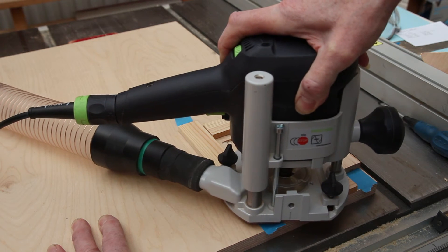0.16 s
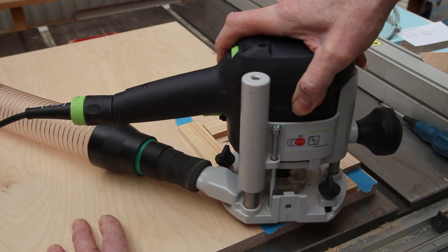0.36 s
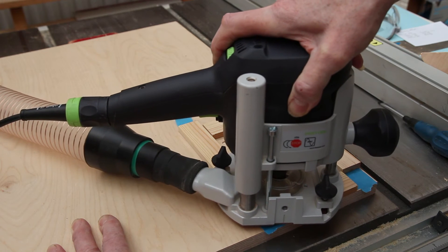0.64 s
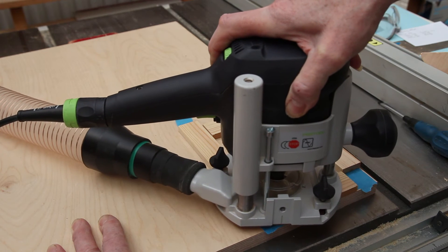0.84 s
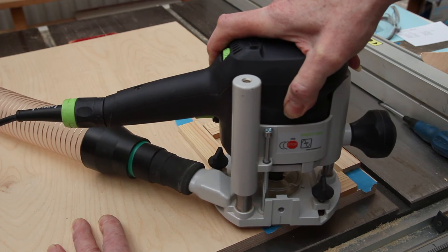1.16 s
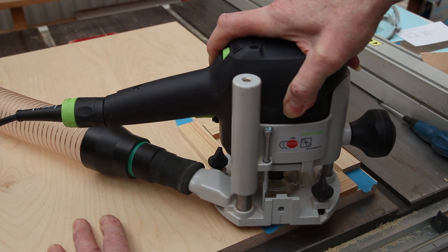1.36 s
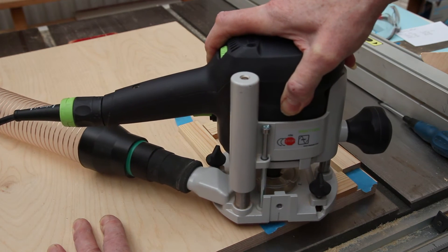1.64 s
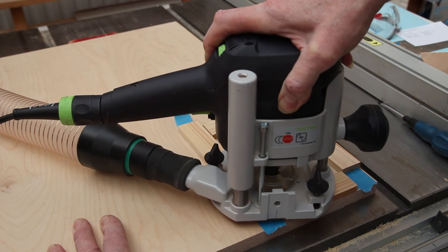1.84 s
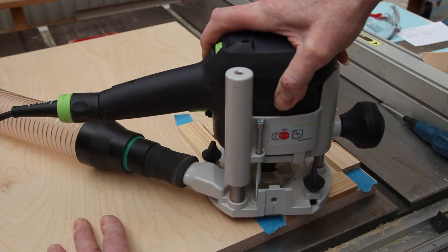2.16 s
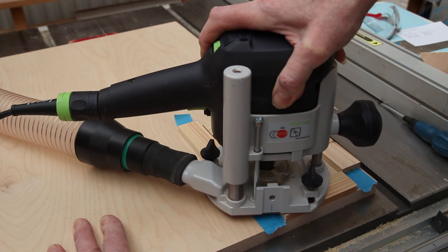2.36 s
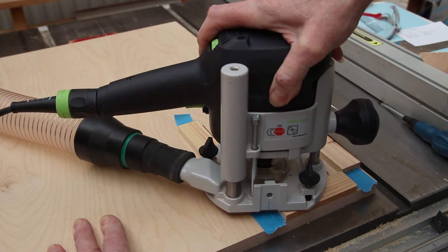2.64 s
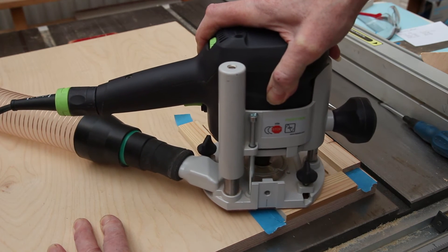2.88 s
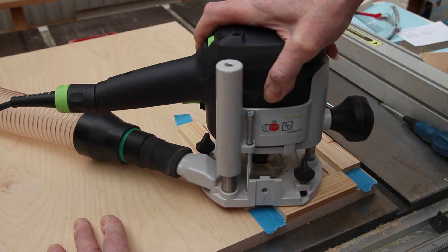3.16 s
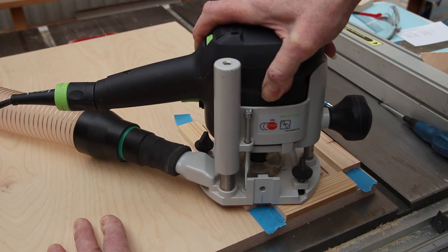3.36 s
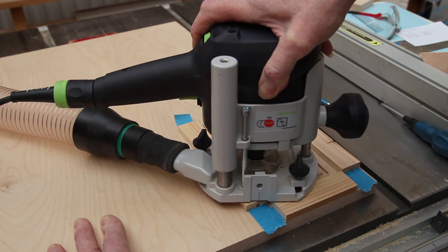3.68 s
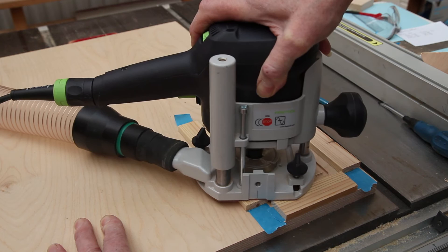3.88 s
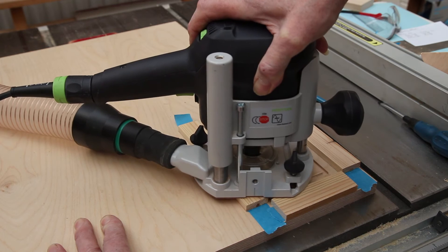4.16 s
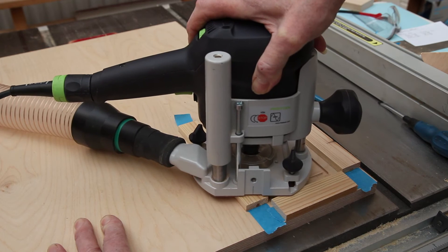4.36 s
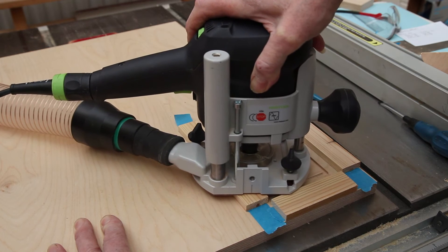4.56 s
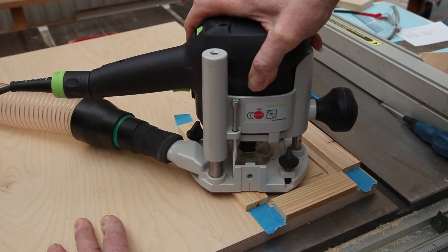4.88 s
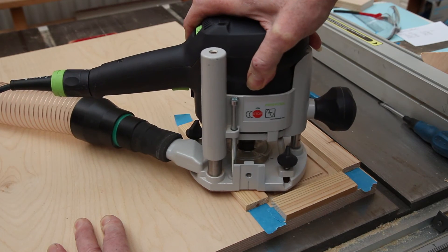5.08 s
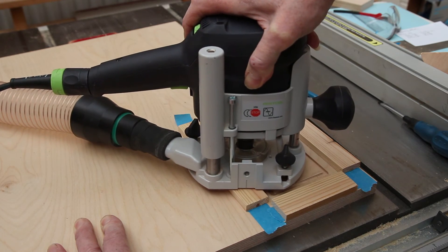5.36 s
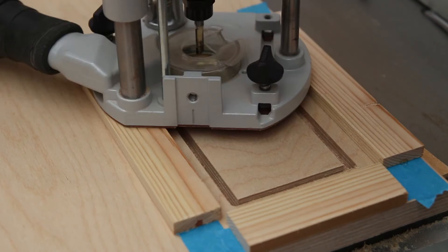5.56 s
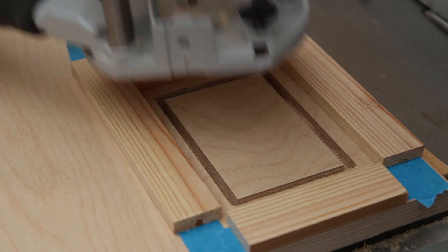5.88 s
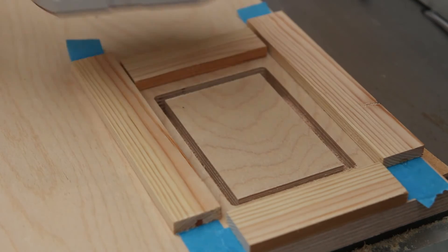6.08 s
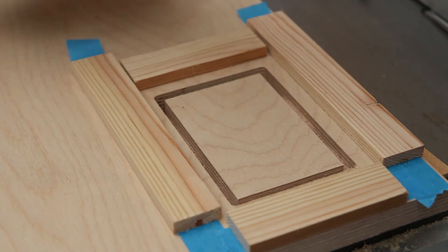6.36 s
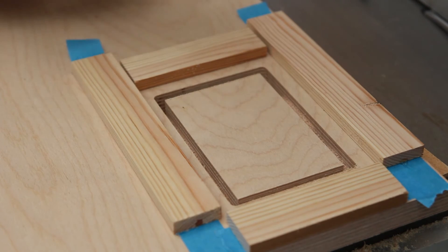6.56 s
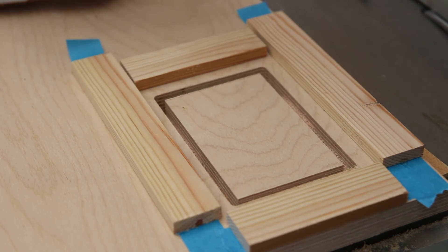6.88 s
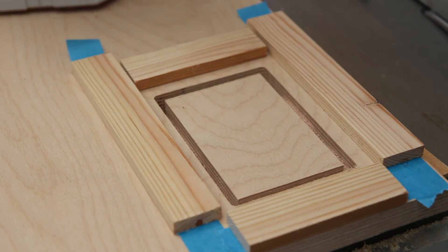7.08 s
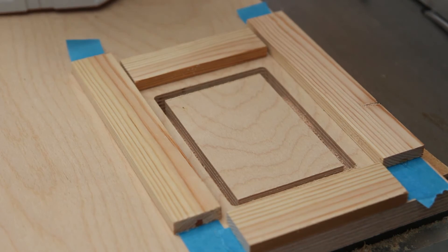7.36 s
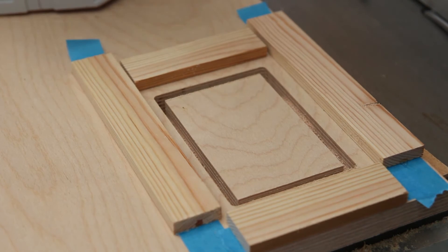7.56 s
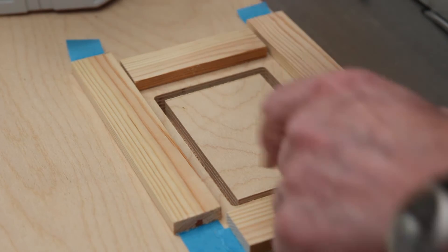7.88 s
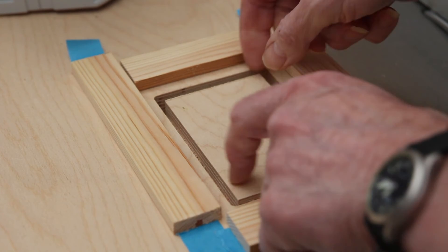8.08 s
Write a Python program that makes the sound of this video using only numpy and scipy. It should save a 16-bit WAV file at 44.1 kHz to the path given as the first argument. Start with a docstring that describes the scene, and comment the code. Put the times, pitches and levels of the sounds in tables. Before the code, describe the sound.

Close up in a workshop, a router bit shrieks unevenly through plywood above a humming motor and rushing air, spinning free for a moment before biting again. The loud noise stops suddenly, leaving low room tone. A few tiny ticks and a quick run of snaps from a dragged dust hose follow, then several dull thuds on the bench and a soft rustle of cloth.

```python
"""A plunge router screeches through plywood: its bit chatters near 5 kHz over motor tones and a roar
of air and chips. The tones follow the shaft, which slows under the load of an uneven hand feed.
At 5.6 s the sound cuts off abruptly. In the quiet shop the ribbed dust hose rattles over an edge, the
tool is set down with dull knocks that ring the bench top, and a sleeve brushes the board."""
import sys
import numpy as np
from scipy import signal
from scipy.fft import rfft, irfft, next_fast_len
from scipy.io import wavfile
from scipy.ndimage import uniform_filter1d, map_coordinates

SR = 44100
rng = np.random.default_rng(int(sys.argv[2]) if len(sys.argv) > 2 else 0)


def wav_record(signal):
    """Record a signal, one row per channel, as 16-bit PCM in the file named by sys.argv[1]."""
    frames = np.transpose(np.atleast_2d(signal))
    bounded = np.clip(frames, -1, 1)
    # unit amplitude maps onto the largest positive 16-bit level
    quanta = np.round(bounded * 32767).astype(np.int16)
    wavfile.write(sys.argv[1], SR, quanta)


N = 362943

# Stereo images of the router's noise and of the quiet sounds. Each row: Hz, left-right likeness.
NEAR_IMAGE = [(60, 0.93), (180, 1), (550, 0.99), (1650, 0.99), (4970, 0.78), (15000, 0.091)]
FAR_IMAGE = [(60, 0.99), (240, 0.86), (950, 0.28), (3770, 0.18), (15000, -0.14)]
# The scuff of hose or cloth on wood. Each row: frequency in Hz, level in dB.
SCUFF_SPECTRUM = [(2200, -19.5), (3300, -0.5), (4500, -4), (5800, -10), (7000, -15), (9000, -27)]


def router():
    """Chatter, roar and motor around one shaft; the load bends its speed and drives the tones."""
    # The bit is in the wood. Each row: entry and exit in seconds.
    cuts = [(-.1, 1.06), (1.511, 5.7)]
    # The uneven feed. Each row: time in seconds, turns a second, chatter in dB, outer sideband trim in dB.
    feed = [(0.0, 322.8, -15, -7.5), (0.04, 321.3, -18.5, -8), (0.09, 324, -21, -7.5),
            (0.2, 326.3, -22.5, -5), (0.24, 331, -25.5, -3), (0.32, 327.4, -21, -6),
            (0.35, 328.4, -27, 0.5), (0.41, 329.5, -19.5, -5), (0.51, 329.8, -25, -3),
            (0.55, 328.7, -19, -7), (0.6, 327.8, -25.5, -2), (0.65, 329.7, -20, -6), (0.8, 328.2, -23, -4),
            (0.89, 328.6, -23, -2), (1.0, 329.5, -21, -5.5), (1.07, 327, -23, -6.5),
            (1.1, 334.8, -19.5, 1.5), (1.46, 332.2, -23.5, -1), (1.515, 331.5, -21, -5),
            (1.63, 328.7, -23, -4.5), (1.71, 324, -18.5, -6), (1.8, 325.5, -24.5, -3.5),
            (1.93, 323.4, -17.5, -5.5), (2.0, 328, -29, 0), (2.085, 328.4, -28.5, 1.5),
            (2.11, 326.3, -20, -5.5), (2.17, 324.8, -21.5, -4.5), (2.24, 324.8, -18, -8.5),
            (2.31, 327, -30.5, 4.5), (2.37, 327.6, -22.5, -10), (2.41, 329.3, -29, 1),
            (2.57, 330.5, -22.5, -4), (2.65, 329.4, -26, -0.5), (2.71, 325, -19.5, -7),
            (2.75, 327.2, -25, 2.5), (2.8, 323.7, -24.5, 0), (2.98, 329.7, -31.5, 2),
            (3.08, 324.7, -23, -2), (3.2, 328, -30, 5.5), (3.28, 330.5, -24, -4), (3.34, 327.2, -24, 1.5),
            (3.38, 327, -20, -4), (3.52, 323.7, -19.5, -5.5), (3.65, 328.4, -29.5, 2), (3.72, 327, -19, -4),
            (3.83, 330.2, -31, 4.5), (3.94, 325, -17.5, -5.5), (3.99, 327.2, -22, -2.5),
            (4.03, 326, -18, -5), (4.07, 323, -22.5, 1.5), (4.11, 320.4, -19, -8.5), (4.15, 326.4, -21, -5),
            (4.2, 320.2, -19, -7.5), (4.28, 323, -20.5, -3), (4.32, 328.4, -22.5, -4.5),
            (4.41, 326.4, -22.5, -5), (4.47, 330.2, -23, -1.5), (4.52, 327.5, -27.5, 2),
            (4.6, 324, -16, -8.5), (4.65, 324.8, -25, -1), (4.69, 329.6, -26.5, -0.5), (4.76, 326, -15, -8),
            (4.83, 327.5, -25.5, -3.5), (4.88, 325.3, -17, -5.5), (5.01, 323.8, -20.5, -3),
            (5.07, 322.2, -19.5, -7), (5.19, 333.2, -25.5, -3.5), (5.32, 327.3, -20.5, -5.5),
            (5.39, 331, -24, -4), (5.45, 329, -18, -4.5), (5.49, 327.2, -26.5, -1.5),
            (5.52, 329.7, -21, -7.5), (5.55, 327, -27, 3), (5.59, 327, -23.5, -3.5)]
    # The mix at the usual load. Each row: time in seconds, then in dB the roar, the unbalance tone,
    # the fourth-order tone and the chatter's lean to the left.
    mix = [(0, -28.5, -40.5, -40.5, -2.5), (.1, -30.5, -38.5, -44, 0), (.28, -29, -41, -36.5, -2.5),
           (.85, -27.5, -46, -45, -3), (1.06, -27, -43, -38.5, -1), (1.16, -27, -35.5, -41, -3),
           (1.34, -23, -37, -37, -3), (1.48, -21, -35, -30, -3), (1.62, -27, -43.5, -44, -6),
           (1.8, -28.5, -39.5, -39, -2), (2.5, -27.5, -47, -37.5, -4), (2.85, -29, -44.5, -34.5, -3),
           (3.45, -27, -42, -33, -1), (3.95, -27.5, -45.5, -33.5, -1), (4.1, -28, -40.5, -35, -4),
           (4.27, -29, -45, -34, -2), (4.5, -27.5, -47.5, -34.5, -0.5), (5.08, -29, -45, -37, -3),
           (5.16, -28, -49, -36.5, -1.5), (5.6, -26, -53, -35, -1.5)]
    cutoff_s, bite_s, leave_s, fade_s = 5.602, 0.0086, 0.03, 0.0009
    drift_hz, judder_hz, usual_chatter_db = 0.252, 0.8, -23.5
    n = int(cutoff_s * SR)
    t = np.arange(n) / SR
    cutting = sum(np.clip(1 + np.minimum((t - enters) / bite_s, (leaves - t) / leave_s), 0, 1)
                  for enters, leaves in cuts)
    speed, chatter_db, outer_db = curves(feed, n)
    roar_db, unbalance_db, fourth_db, lean_db = curves(mix, n)
    push_db = cutting * (chatter_db - usual_chatter_db)
    turns = np.cumsum(speed + drift_hz * wobble(15, n) + cutting * judder_hz * wobble(30, n)) / SR
    screech = bit_chatter(turns, push_db, outer_db, first_cut=t < cuts[1][0] - leave_s)
    screech += amp(outer_db - 15) * chip_spray(turns)
    roar = motor_whine(turns, cutting) + air_roar(cutting, roar_db)
    hum = shaft_hum(turns, push_db, unbalance_db, fourth_db)
    sway = panned(lean_db + 0.17 * push_db + 2 * wobble(11, n))  # harder chatter leans left
    tool = cutting ** 2 * amp(chatter_db) * sway * screech
    tool += panned(-2.9)[:, None] * (amp(roar_db) * roar + hum)
    fade = np.clip((n - np.arange(n)) / (fade_s * SR), 0, 1)
    return np.pad(tool * fade, ((0, 0), (0, N - n)))


def bit_chatter(turns, push_db, outer_db, first_cut):
    """The bit leaves waves on the wood; chopped once a turn, its tone splits into sidebands."""
    # One row a shaft order, from 6 below the chatter upward. Each row: dB in the first cut, in the second.
    sidebands = [(-21, -18.5), (-14, -13), (-13, -9.5), (-8.5, -12.5), (-2.5, -8), (-2.5, 0), (1, 0.5),
                 (-9, -8), (-8.5, -8), (-12, -10), (-19, -18.5), (-13, -15), (-18, -27.5), (-25, -21),
                 (-15.5, -26.5), (-17, -23.5)]
    # Around twice the chatter pitch. Each row: offset in shaft orders, dB in the first cut, in the second.
    octave = [(-4, -28, -29), (-3, -28, -25), (-2, -21, -22), (-1, -16, -22), (0, -17, -18), (1, -28, -23),
              (2, -33, -28)]
    waves_per_turn, flutter, skip_db = 15.7, 0.32, -10
    loose = amp(-0.36 * push_db)  # strong chatter locks in and fades less
    centre_dip_db, side_dip_db = (skip_db * loose * np.clip(3 * (wobble(40, len(turns)) - .7), 0, 1)
                                  for _ in range(2))  # momentary dropouts
    out = 0
    for k, dbs in enumerate(sidebands, -6):
        db = np.where(first_cut, *dbs) + (centre_dip_db if k == 0 else side_dip_db)
        if k not in (0, 1):
            db += outer_db
        out += amp(db) * tone((waves_per_turn + k) * turns, fading=flutter * loose, rate=90, apart=0.38)
    for k, *dbs in octave:
        db = np.where(first_cut, *dbs) + outer_db
        out += amp(db) * tone((2 * waves_per_turn + k) * turns, fading=0.9, rate=90, apart=0.38)
    return out


def chip_spray(turns):
    """Chips leave once a turn: a bright hiss pulsing with the shaft."""
    # Each row: frequency in Hz, level in dB.
    spectrum = [(1500, -43), (3000, -42.5), (5000, 1), (6500, -33.5), (9000, -26), (11000, -17.5),
                (13500, -24), (15700, -10.5)]
    n = len(turns)
    pulse = 1 + .5 * np.cos(2 * np.pi * np.pad(turns, (0, N - n)))
    return rush(spectrum, NEAR_IMAGE, pulse)[:, :n]


def motor_whine(turns, cutting):
    """Harmonics of the shaft; the upper ones change balance as the bit enters the wood."""
    # Each row: shaft order, level in dB against the roar.
    low_orders = [(2, -24.5), (3, -18.5), (5, -16.5), (6, -15.5), (7, -19.5), (8, -17), (9, -20.5),
                  (10, -17)]
    # Each row: shaft order, dB against the roar when spinning free, and when cutting.
    high_orders = [(11, -19, -21), (12, -16, -21), (13, -26, -18), (14, -19, -18), (15, -13, -20),
                   (16, -15, -17), (17, -19, -22), (18, -20, -18), (19, -28, -24), (20, -28, -24)]
    out = sum(amp(db) * tone(k * turns, fading=1.0, rate=25, apart=0.4335) for k, db in low_orders)
    for k, free_db, cut_db in high_orders:
        db = (1 - cutting) * free_db + cutting * cut_db
        out += amp(db) * tone(k * turns, fading=0.74, rate=25, apart=0.41)
    return out


def air_roar(cutting, roar_db):
    """The stream of air and dust, coloured by the plywood sheet that sounds along with it."""
    # Each row: frequency in Hz, level in dB.
    spectrum = [(25, -51.5), (64, -52), (178, -23), (300, -14), (460, -12), (850, -7), (920, -6),
                (1340, -7), (1500, -3.5), (3300, -6.5), (4000, -5.5), (5500, -7), (7500, -11), (11200, -17),
                (15700, -32)]
    n = len(cutting)
    air = unit(filtered(rush(spectrum, NEAR_IMAGE)[:, :n], plywood))
    chipless = uniform_filter1d(1 - cutting, size=7000)  # the dust thins and thickens slowly
    air -= .5 * chipless * filtered(air, lambda hz: hz > 3600)  # duller without chips
    swell_db = np.clip(roar_db + 26.5, 0, None)
    air -= (1 - amp(-0.6 * swell_db)) * filtered(air, lambda hz: hz > 6000)  # swells favour lows and mids
    return amp(1.5 + 0.53 * wobble(12, n)) * air


def plywood(hz):
    """Gain of the sheet's resonances, roughened by the shop's many narrow standing waves."""
    # Each row: centre in Hz, width in Hz, lift in dB.
    resonances = [(920, 33, 6.5), (1054.4, 12.3, 12.5), (1119, 23, 6.5), (1225, 43, 7), (1780, 12, -5),
                  (2160, 48, 0.5), (2310, 76, 1.5), (2496, 55, 4.5)]
    lift_db = sum(db * np.exp(-((hz - centre) / width) ** 2) for centre, width, db in resonances)
    ripple_db = 1.8 * np.interp(hz, 22 * np.arange(1100), rng.standard_normal(1100))
    return amp(lift_db + ripple_db)


def shaft_hum(turns, push_db, unbalance_db, fourth_db):
    """Unbalance hums once a turn; it and the fourth order grow with the chatter."""
    gain = amp(unbalance_db + 0.21 * push_db + 0.75 * wobble(10, len(turns)))
    unbalance = gain * tone(turns, fading=0.28, rate=17, apart=.08)
    fourth = amp(fourth_db + 0.84 * push_db) * tone(4 * turns, fading=0.46, rate=40, apart=0.27)
    return unbalance + fourth


def hose_rattle():
    """Each rib snaps over the edge and rings the hose wall; the hose's weight thumps the bench."""
    # Each row: start in seconds, level in dB, treble in dB against that level.
    ribs = [(6.148, -32.5, -26), (6.185, -27.5, -16), (6.226, -26.5, -21), (6.256, -25, -17),
            (6.288, -23, -20), (6.316, -26, -22), (6.341, -24, -17), (6.402, -27, -33), (6.471, -25, -17),
            (6.639, -29.5, -22), (6.713, -31, -50), (6.868, -36, -31)]
    # Each row: frequency in Hz, level in dB, t60 in seconds.
    wall_modes = [(810, -0.5, 0.015), (1270, -2.5, 0.013), (1570, -5.5, 0.022), (1920, -1.5, 0.013),
                  (2260, -6, 0.015), (2730, -7, 0.012), (3090, -3.5, 0.013), (3670, -9, 0.01),
                  (4200, -11, 0.0069)]
    echo_s, echo_db, thump_db = 0.008, -8, -31.5
    t, out = np.arange(SR // 3) / SR, 0
    for start, db, treble_db in ribs:
        snap = ringing(wall_modes, t, scatter_db=2.0) * (1 - np.exp(-t / .0006))
        snap += amp(-2) * crack(t, hz=2200, octaves=0.8, t60=0.012)
        snap += amp(treble_db) * crack(t, hz=6200, octaves=0.65, t60=0.058)
        snap += amp(echo_db) * np.roll(snap, round(echo_s * SR))  # a quick echo off the bench or wall
        thump = bench_thud(t, boom_db=-21, body_db=-3) * amp(thump_db + 4.5 * rng.standard_normal())
        out += in_shop(start, amp(db) * snap + thump, wet_db=-6)
    return out


def hose_drag():
    """The hose slides along the edge: a low, grainy drag under a brighter scuff."""
    # Each row: time in seconds, drag in dB, scuff in dB.
    slide = [(5.9, -80, -64), (6.096, -48.5, -56.5), (6.304, -37.5, -42.5), (6.348, -42.5, -47),
             (6.462, -44, -53), (6.6, -53, -60.5), (6.7, -90, -91)]
    # Each row: frequency in Hz, level in dB.
    drag_spectrum = [(150, -2), (300, -5), (900, -3), (1500, -4.5), (2100, -4), (2800, -6), (4000, -37)]
    drag_db, scuff_db = curves(slide)
    return amp(drag_db) * friction(drag_spectrum) + amp(scuff_db) * friction(SCUFF_SPECTRUM)


def bench_knocks():
    """The tool is set down: each knock thuds in the bench top under a short rap and click."""
    # Each row: start in seconds, level in dB, then trims in dB for boom, body, rap and click.
    knocks = [(5.728, -24.5, -38, -11.5, -6, -24), (6.93, -19.5, -37.5, -4, -3.5, -25),
              (7.15, -15.5, -7.5, -10, -6, -19), (7.159, -20, -13, -6, -7.5, -6.5),
              (7.255, -41.5, -7, -17, 0, 0), (7.376, -53, -7.5, -3, -9, -18),
              (7.534, -25, -16, -1, -27, -30), (8.157, -45, -15, 2, 8, -15)]
    t, out = np.arange(SR // 2) / SR, 0
    for start, db, boom_db, body_db, rap_db, click_db in knocks:
        thud = bench_thud(t, boom_db, body_db)
        rap = amp(rap_db) * crack(t, hz=1120, octaves=0.76, t60=0.021)
        click = amp(click_db) * crack(t, hz=2500, octaves=0.94, t60=0.015)
        out += in_shop(start, amp(db) * (thud + rap + click), wet_db=-4)
    return out


def bench_thud(t, boom_db, body_db, upper_db=-6.5):
    """The bench top rings with a soft attack; the boom is its lowest modes, woken by heavy blows."""
    # Each row: frequency in Hz, level in dB, t60 in seconds.
    top_modes = [(77.4, -1, 0.35), (101.2, -1, 0.39), (134, -7, 0.28), (170, 1.5, 0.053),
                 (232.3, -3.5, 0.19), (323, 4, 0.055), (435, -7.5, 0.082), (562, -12, 0.1),
                 (950, -6, 0.056)]
    modes = [(hz, db + (boom_db if hz < 112 else body_db if hz < 190 else upper_db), t60)
             for hz, db, t60 in top_modes]
    return (1 - np.exp(-t / 0.0029)) * ringing(modes, t, scatter_db=2.5)


def ticks():
    """Small hard parts touch with tiny bright ticks."""
    # Each row: start in seconds, level in dB, centre in Hz.
    touches = [(5.6385, -35, 6800), (5.889, -27, 4200), (5.927, -47, 3500), (6.173, -33, 5000)]
    t = np.arange(SR // 10) / SR
    return sum(in_shop(start, amp(db) * crack(t, hz, octaves=0.6, t60=0.007), wet_db=-13)
               for start, db, hz in touches)


def sleeve_brush():
    """Cloth strokes the board in three layers of friction: rasp, scuff and a high rustle."""
    # Each row: start, rise and hold in seconds, then rasp, scuff and rustle in dB.
    strokes = [(7.415, 0.056, 0.0054, -58.5, -53.5, -68), (7.531, 0.006, .04, -45, -66, -56),
               (7.571, .035, .03, -42, -61, -52), (7.724, 0.063, 0.17, -54.5, -61.5, -77),
               (7.96, 0.032, .12, -61, -66, -82), (8.114, .04, .1, -53.5, -65, -75)]
    # Each row of both spectra: frequency in Hz, level in dB.
    rasp = [(250, 5), (500, -3.5), (1300, -9.5), (1510, 0), (1720, -10), (1950, 0), (2150, -16),
            (2370, -2.5), (2600, -13), (3300, -29), (3880, -21), (4500, -27), (5300, -24), (5700, -14),
            (6100, -16), (6700, -27), (8000, -29)]
    rustle = [(6000, -8), (8500, -13), (10500, -5.5), (12000, -19), (15700, -25.5)]
    out = 0
    for k, (spectrum, fall_db_per_s) in enumerate([(rasp, 145), (SCUFF_SPECTRUM, 151), (rustle, 76)]):
        gain = sum(stroke(start, rise, hold, dbs[k], fall_db_per_s) for start, rise, hold, *dbs in strokes)
        out += gain * friction(spectrum)
    return out


def sleeve_squeak(start=7.58, from_hz=2380, hz_per_s=9000):
    """A faint rising squeak within a stroke."""
    t = np.clip(np.arange(N) / SR - start, 0, .3)
    squeak = tone(np.cumsum(from_hz + hz_per_s * t) / SR, fading=1.5, rate=120, apart=.4)
    return stroke(start, rise=.03, hold=.04, db=-55, fall_db_per_s=500) * squeak


def cuff_taps():
    """A hard part of the cuff taps the board and rings briefly."""
    # Each row: start in seconds, level in dB.
    taps = [(7.536, -41), (7.578, -44.5)]
    # Each row: frequency in Hz, level in dB, t60 in seconds.
    modes = [(1530, -0.5, .04), (1990, -1.5, .035), (2370, -3.5, .04), (6000, -14, .015)]
    t = np.arange(SR // 10) / SR
    return sum(in_shop(start, amp(db) * ringing(modes, t, scatter_db=1.0), wet_db=-4) for start, db in taps)


def shop_hush():
    """Low room tone, gently wavering in level."""
    # Each row: frequency in Hz, level in dB.
    spectrum = [(15, -38.5), (25, -26.5), (164, 0.5), (340, -5), (598, -8), (666, -16), (741, -5),
                (919, -10), (2700, -18.5), (3000, -19), (10000, -27.5), (15500, -37.5)]
    return amp(-51.5 + 0.84 * wobble(3)) * panned(-2.0)[:, None] * rush(spectrum, FAR_IMAGE)


def in_shop(start, dry, wet_db):
    """Places a short sound a little to the right, with a fresh tail of the shop's echoes."""
    # Each row: frequency in Hz, t60 in seconds.
    decay = [(100, 0.76), (400, 0.27), (1500, 0.19), (5000, 0.19), (12000, 0.037)]
    # Each row: frequency in Hz, left-right likeness.
    echo_image = [(60, 0.88), (240, 0.97), (950, 1), (3770, 0.49), (15000, 0.028)]
    hz, t, noise = signal.stft(rng.standard_normal((2, SR // 2)), SR, nperseg=256)
    tail = signal.istft(noise * amp(-60 * t / along(decay, hz)[:, None]), SR, nperseg=256)[1]
    tail = paired(tail, [(100, -3.0), (1000, -0.5)], echo_image)
    tail = amp(wet_db) * tail / np.linalg.norm(tail[0])
    tail[:, 0] = 1  # the direct sound
    heard = panned(-3.1)[:, None] * signal.fftconvolve(dry[None], tail, axes=1)
    heard = filtered(heard, lambda f: (1j * f / (1j * f + 52)) ** 2)  # small things radiate no deep bass
    return np.pad(heard, ((0, 0), (round(start * SR), N)))[:, :N]


def tone(cycles, fading, rate, apart):
    """A gliding tone in a room: echoes make it fade and slip, a little differently on each side."""
    n = len(cycles)
    shared, own = (wobble(rate, n) + 1j * wobble(rate, n) for _ in range(2))
    carrier = np.exp(2j * np.pi * (cycles + rng.random()))
    mid, side = (carrier * (1 + fading * shared)).real, (carrier * apart * own).real
    return unit(np.array([mid + side, mid - side]))


def ringing(modes, t, scatter_db):
    """Decaying modes, struck at new strengths each time."""
    return sum(amp(db + scatter_db * rng.standard_normal() - 60 * t / t60)
               * np.sin(2 * np.pi * hz * t + k * k) for k, (hz, db, t60) in enumerate(modes))


def crack(t, hz, octaves, t60):
    """A puff of noise around hz, at peak 1."""
    puff = rng.standard_normal(len(t)) * amp(-60 * t / t60) * (t > 0)
    delay_s = 0.64 / (hz * octaves)  # keeps the attack whole
    band = lambda f: np.exp(-(np.log2((f + 1) / hz) / octaves) ** 2 - 2j * np.pi * f * delay_s)
    puff = filtered(puff, band)
    return puff / np.abs(puff).max()


def friction(spectrum):
    """The slightly grainy noise of rubbing."""
    return rush(spectrum, FAR_IMAGE, pulse=amp(2.5 * wobble(220)))


def stroke(start, rise, hold, db, fall_db_per_s):
    """Gain that rises, holds and dies away."""
    t = np.arange(N) / SR - start
    return np.clip(t / rise, 0, 1) * amp(db - fall_db_per_s * np.clip(t - rise - hold, 0, None))


def rush(spectrum, image, pulse=1):
    """Stereo noise at rms 1, beating with pulse."""
    return unit(paired(pulse * rng.standard_normal((2, N)), spectrum, image))


def paired(pair, spectrum, image):
    """Two unrelated signals, coloured and mixed into left and right of the given likeness."""
    turn = lambda hz: np.arccos(np.clip(along(image, hz), -1, 1)) / 2
    mid, side = filtered(pair, lambda hz: amp(along(spectrum, hz)) * [np.cos(turn(hz)), np.sin(turn(hz))])
    return np.array([mid + side, mid - side])


def filtered(x, response):
    """x through a complex frequency response."""
    m = next_fast_len(x.shape[-1] + 8192)
    return irfft(rfft(x, m) * response(np.fft.rfftfreq(m, 1 / SR)), m)[..., :x.shape[-1]]


def wobble(rate, n=N):
    """A random curve with rate knots a second."""
    return map_coordinates(rng.standard_normal(4000), [np.arange(n) * rate / SR], order=1)


def curves(rows, n=N):
    """One value per sample for each column after the time."""
    times, *columns = np.transpose(rows)
    return [np.interp(np.arange(n) / SR, times, column) for column in columns]


def along(points, hz):
    """Reads (Hz, value) points on a log axis."""
    freqs, values = np.transpose(points)
    return np.interp(np.log(hz + 1), np.log(freqs + 1), values)


def panned(db):
    """Left and right gains, db apart."""
    return amp([db / 2, -db / 2])


def amp(db):
    """Gain of a level in dB."""
    return 10 ** (np.asarray(db) / 20)


def unit(x):
    """x at rms 1."""
    return x / np.sqrt(np.mean(np.abs(x) ** 2) + 1e-20)


def scene():
    """The router, then handling sounds, over the shop's hush."""
    return (shop_hush() + router() + hose_rattle() + bench_knocks() + ticks() + hose_drag()
            + sleeve_brush() + sleeve_squeak() + cuff_taps())


def record(dry):
    """The microphone drops the deepest bass; nothing passes above 15.7 kHz."""
    return filtered(dry, lambda hz: (1j * hz / (1j * hz + 28)) ** 3 * (hz < 15700))


dry = scene()
out = record(dry)
wav_record(out)
```